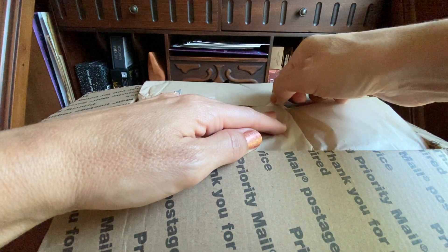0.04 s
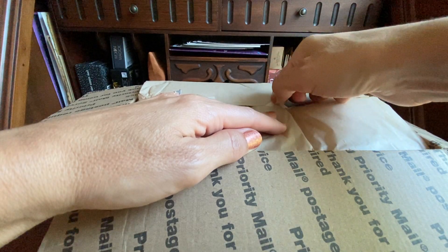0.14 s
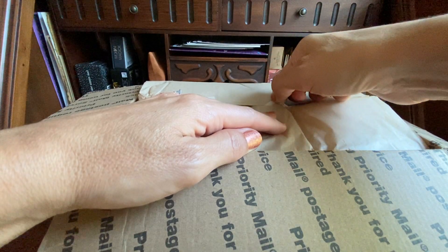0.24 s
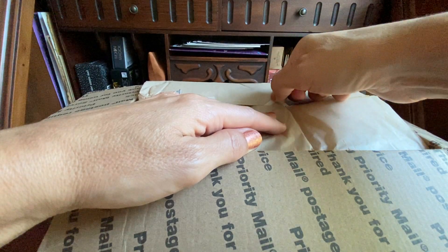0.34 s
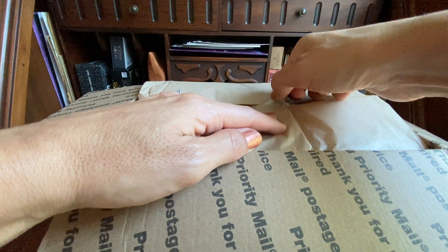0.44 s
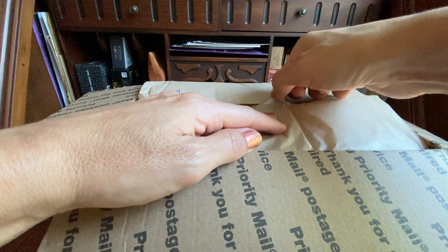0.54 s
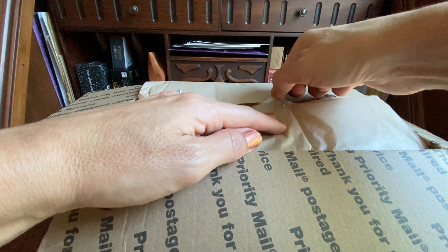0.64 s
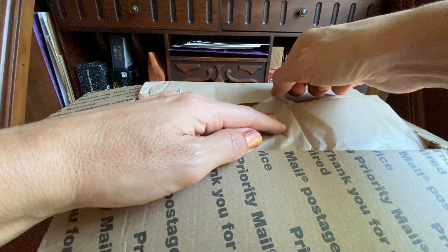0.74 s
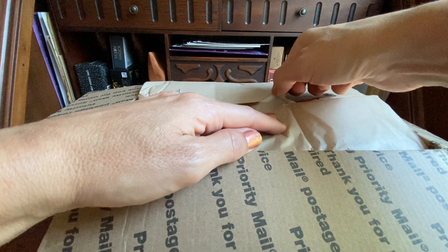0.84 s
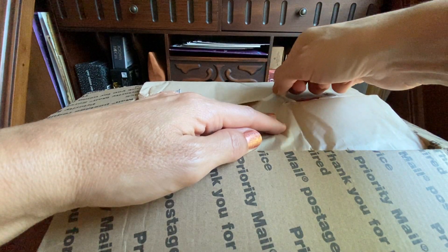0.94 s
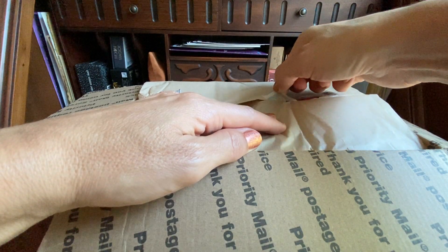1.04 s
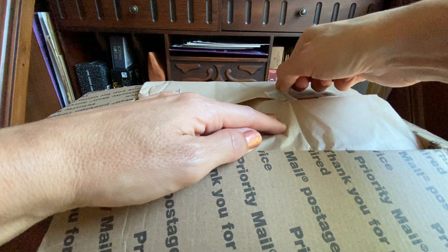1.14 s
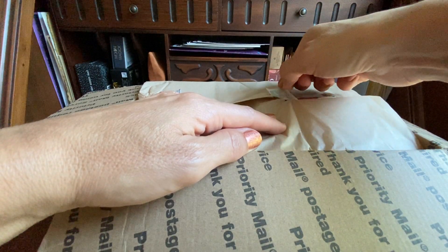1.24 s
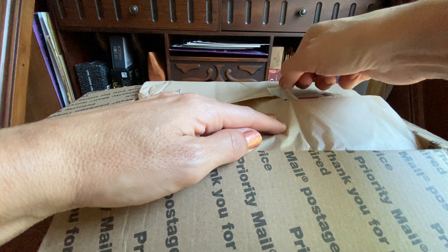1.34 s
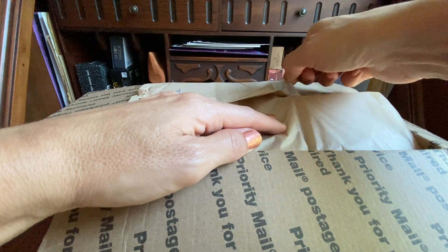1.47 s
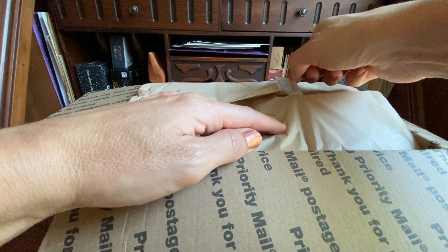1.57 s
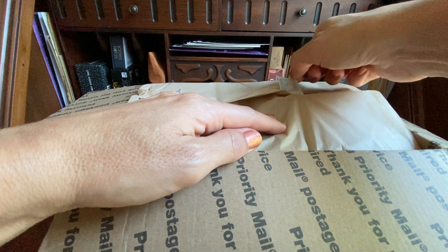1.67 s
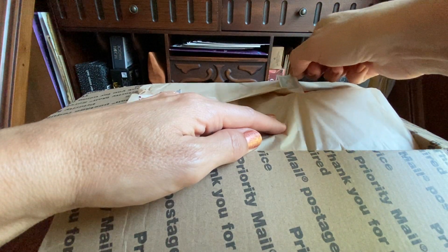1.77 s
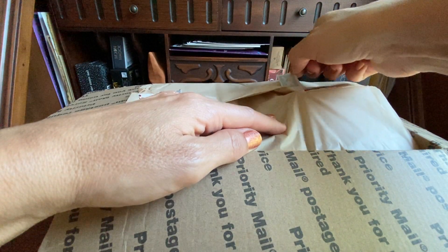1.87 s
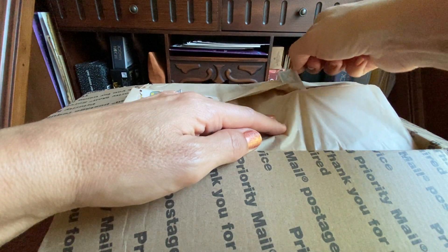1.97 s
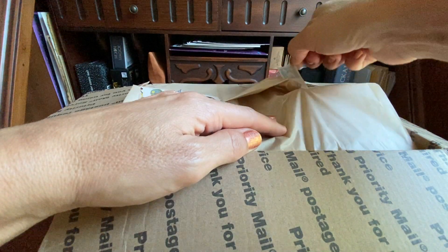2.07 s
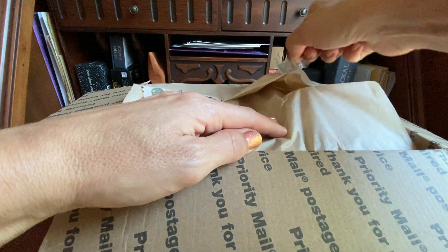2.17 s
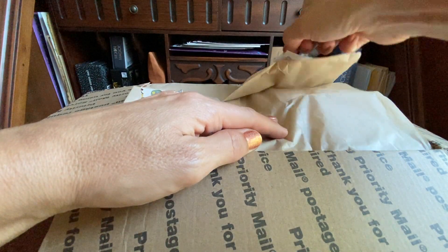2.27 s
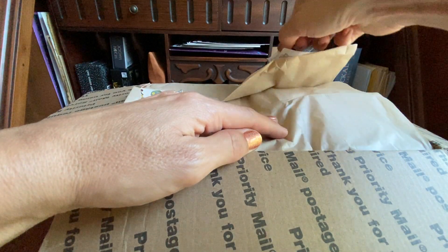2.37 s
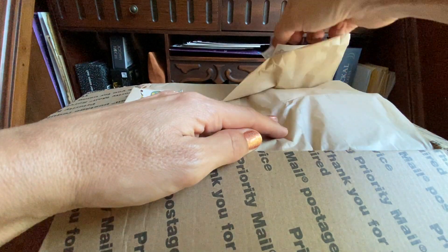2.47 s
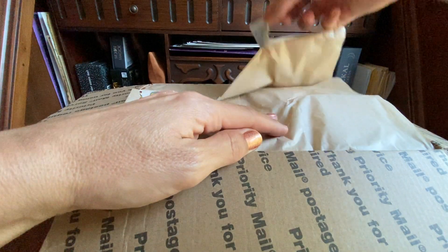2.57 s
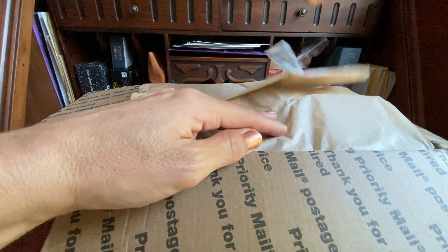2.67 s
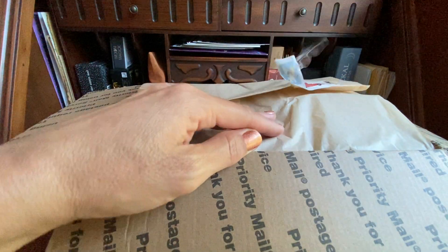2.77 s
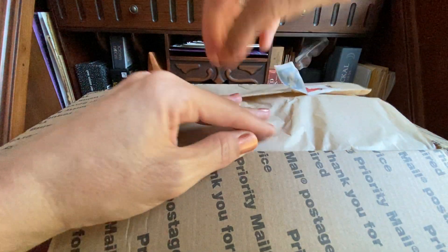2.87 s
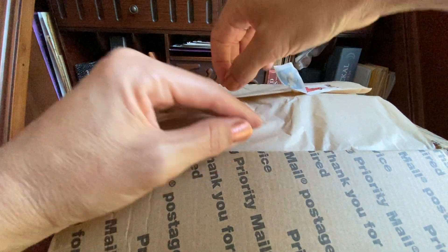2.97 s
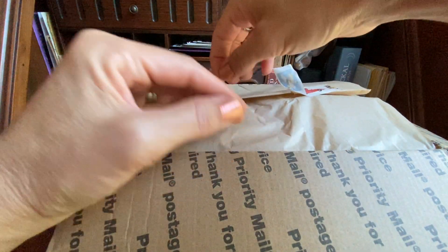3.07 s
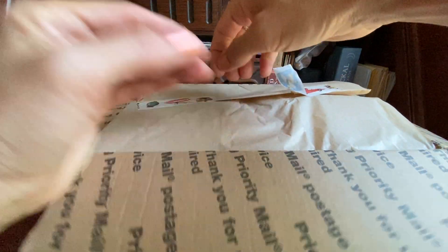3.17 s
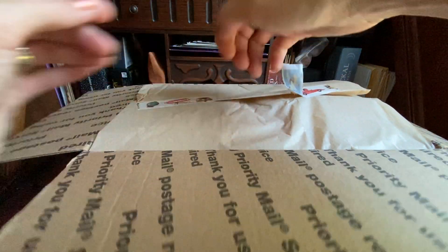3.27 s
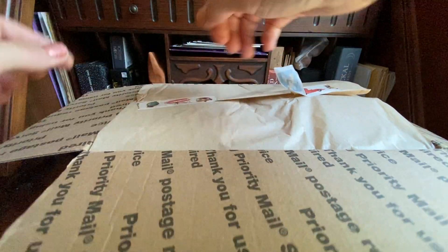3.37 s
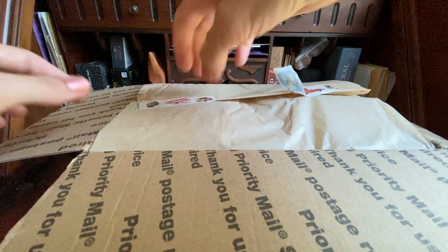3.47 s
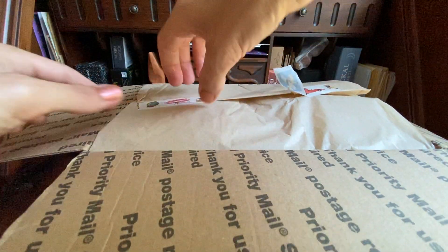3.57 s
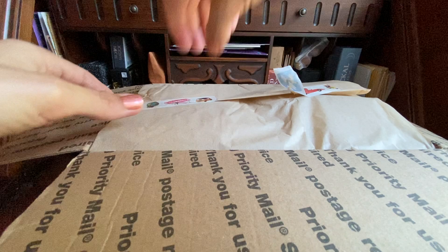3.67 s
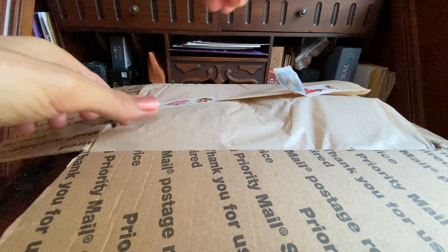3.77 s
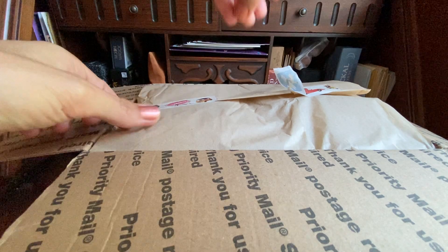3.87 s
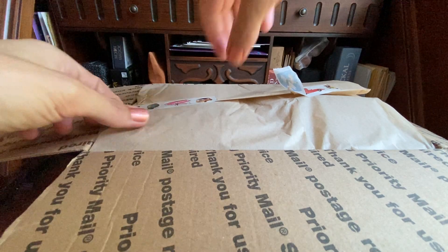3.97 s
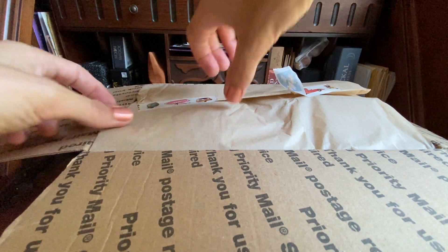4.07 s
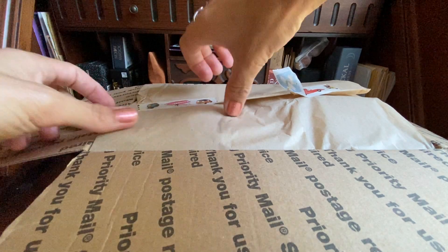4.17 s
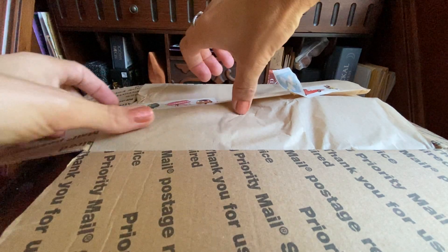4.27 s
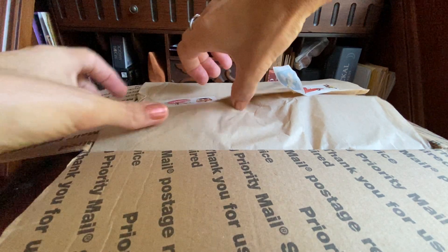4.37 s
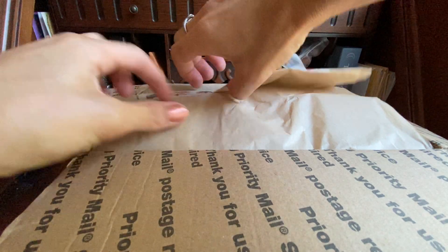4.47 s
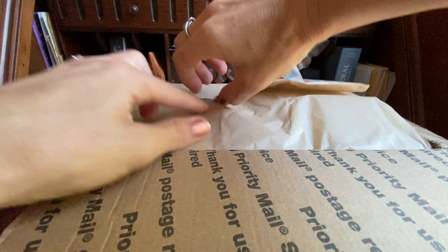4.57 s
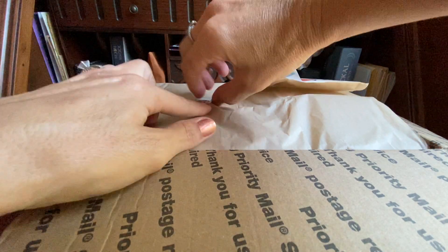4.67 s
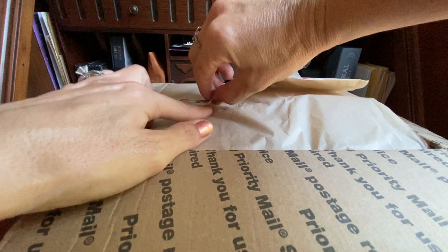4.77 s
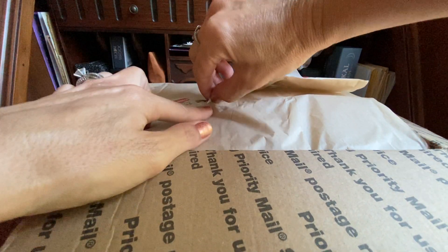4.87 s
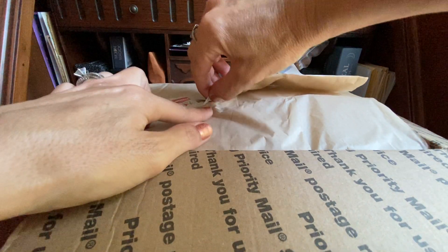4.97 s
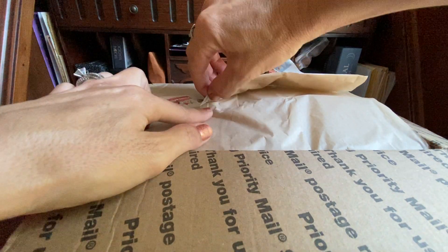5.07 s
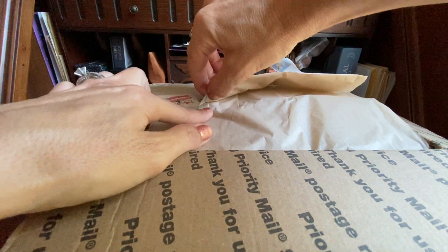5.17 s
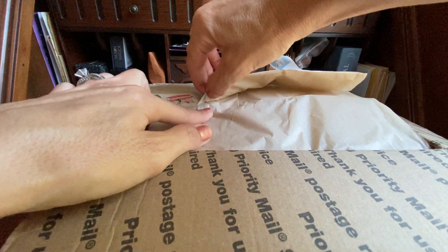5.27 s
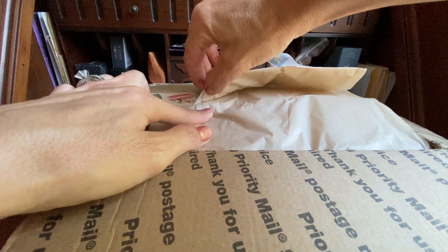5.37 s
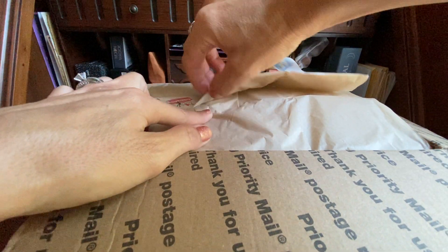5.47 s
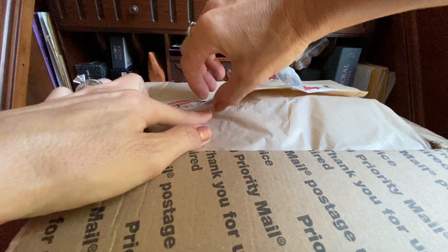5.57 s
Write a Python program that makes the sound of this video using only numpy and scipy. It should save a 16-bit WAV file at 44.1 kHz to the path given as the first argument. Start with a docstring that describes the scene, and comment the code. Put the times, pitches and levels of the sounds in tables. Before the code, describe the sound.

Close-up of fingers peeling paper tape from a padded paper bag, faint crackles building to a sharp ripping snap, then quieter crinkling.

```python
"""Fingers peel and tear paper tape off a padded paper bag in a cardboard box, close to a phone in a quiet room.
The peeling is swarms of tiny clicks as glue and fibres let go, filtered into bands that follow the pull.
Single creases snap as short noise bursts, knocks ring the box walls, and fingers brush and pat a hollow flap.
The two microphone ports share part of each sound and hear the rest by different bounces.
Soft room noise and a faint echo tail lie behind it all."""
import sys
import numpy as np
from scipy import signal
from scipy.fft import rfft, irfft, next_fast_len
from scipy.io import wavfile
from scipy.ndimage import uniform_filter1d

SR = 44100
rng = np.random.default_rng(int(sys.argv[2]) if len(sys.argv) > 2 else 0)


def generate_wav(sig):
    """Save sig (samples, or channels by samples) to the path in sys.argv[1] as 16-bit PCM at SR."""
    pcm = np.round(np.clip(np.atleast_2d(sig).T, -1, 1) * 32767).astype(np.int16)
    wavfile.write(sys.argv[1], SR, pcm)


N = 248268  # length in samples


def undb(db):
    """Turn decibels into a plain gain."""
    return 10 ** (np.asarray(db) / 20)


def unit(x):
    """Scale a sound to an average (RMS) level of 1."""
    return x / np.sqrt(np.mean(x ** 2))


def on_log(table, hz):
    """Read a (frequency, value) table on a log-frequency axis."""
    table_hz, value = np.transpose(table)
    return np.interp(np.log(np.maximum(hz, 1)), np.log(table_hz), value)


def read(table):
    """Turn the columns of a timed table into curves, sample by sample."""
    start_s, *columns = np.transpose(table)
    time_s = np.arange(N) / SR
    return [np.interp(time_s, start_s, column) for column in columns]


def shape(x, gain_at):
    """Filter along the last axis by a function of frequency."""
    length = x.shape[-1]
    size = next_fast_len(length + 4096)
    hz = np.arange(size // 2 + 1) * SR / size
    return irfft(rfft(x, size) * gain_at(hz), size)[..., :length]


def band(hz, lo_hz, hi_hz):
    """Gain of a steep filter that keeps what lies between two frequencies."""
    below = 1 + (lo_hz / (hz + 1)) ** 6
    above = 1 + (hz / hi_hz) ** 6
    return 1 / np.sqrt(below * above)


def resonances(table, hz):
    """Added gains of resonances, each a hump with its own pitch, width and level."""
    return sum(undb(level_db) / (1 + (2 * (hz - pitch_hz) / width_hz) ** 2)
               for pitch_hz, width_hz, level_db in table)


def paper(hz):
    """Gain of the bag: flat, plus resonances where the paper sounds more easily."""
    # bag and sheet resonances: pitch_hz, width_hz, level_db
    paper_modes = [(222, 180, 4.5), (810, 120, -2), (1186, 210, 2.5), (1860, 120, -2), (2220, 66, -4.5),
                   (5950, 1800, -3), (11600, 2700, -14.5)]
    return 1 + 0.67 * resonances(paper_modes, hz)


def swell(t_ms, rise_ms, fade_ms):
    """Loudness curve that grows for rise_ms and then dies away."""
    rise = (t_ms / max(rise_ms, .1)) ** 2
    fade = np.exp((rise_ms - t_ms) / max(fade_ms, .3))
    return np.minimum(rise, fade)


def walk(rate):
    """Random wandering: a new level is drawn rate times a second, with a smooth slide between levels."""
    hold = int(SR / rate)
    steps = np.repeat(rng.standard_normal(N // hold + 1), hold)
    return 0.95 * uniform_filter1d(steps, hold)[:N]


def room_noise():
    """The quiet room: steady random noise coloured by a frequency curve."""
    # colour of the room noise: pitch_hz, relative level_db (per Hz)
    room_colour = [(18, -32), (30, 3), (71, 11.5), (239, 4.5), (684, -41), (1010, -1), (1860, -20.5),
                   (3140, -22), (4080, -20), (10200, -52.5), (16000, -39.5)]
    noise = rng.standard_normal((3, N))
    coloured = shape(noise, lambda hz: undb(on_log(room_colour, hz)))
    return unit(coloured) * undb(-74.5)


def reverb(x, t60, db):
    """Faint diffuse tail from furniture and walls: fading noise that falls 60 dB in t60 seconds."""
    t = np.arange(SR // 2) / SR
    tail = rng.standard_normal((2, len(t))) * np.exp(-np.log(1000) * t / t60)
    tail = shape(tail, lambda hz: hz / (hz + 300) / (1 + hz / 4000))
    tail = tail * undb(db) / np.sqrt((tail[0] ** 2).sum())
    return signal.fftconvolve(x[None], tail, axes=1)[:, :N]


def pats():
    """Fingers brush and pat the box flap: skin-friction noise heard through a few hollow resonances."""
    # pats and brushes: start_s, level_db (noise is halved first), rise_ms, fade_ms, tilt_db (per octave)
    pat_events = [(3.093, -54.5, 6.7, 44, -3), (3.14, -42, 44, 13, -3), (3.182, -23.5, 4.8, 3.1, -6),
                  (3.618, -39, 2.8, 9.3, -5), (3.696, -35, 2.3, 12, 0), (3.709, -30, 5.4, 5.3, 1)]
    # resonances of the hollow flap: pitch_hz, width_hz, level_db
    flap_modes = [(850, 160, 0), (1780, 200, -3), (3000, 320, -4), (4530, 400, -13)]
    lowest_hz = flap_modes[0][0]
    t_ms = np.arange(8192) / SR * 1000
    noise = rng.standard_normal((len(pat_events), 3, len(t_ms)))
    out = np.zeros((3, N))

    def flap_gain(hz, tilt_db):
        octaves = np.log2(np.maximum(hz, lowest_hz) / lowest_hz)
        hollow = resonances(flap_modes, hz) + 0.04 * band(hz, 430.0, 10000.0)
        return hollow * undb(tilt_db * octaves)

    for (start_s, level_db, rise_ms, fade_ms, tilt_db), burst in zip(pat_events, noise):
        burst = shape(burst, lambda hz: flap_gain(hz, tilt_db))
        burst = unit(burst) / 2 * undb(level_db) * swell(t_ms, rise_ms, fade_ms)
        i = int(start_s * SR)
        out[:, i:i + len(t_ms)] += burst
    return out


def knocks():
    """A half-sine push sets the box walls ringing, with new strengths at every knock; low modes build up late."""
    # knocks: start_s, peak_db, push_ms, free (share of the full ring time left by the hand, 0-1),
    # boom_db (extra for the whole-box modes below 150 Hz)
    knock_events = [(0.081, -50.5, 0.57, 0.3, -12), (0.217, -67, 1, 0.3, 3), (1.444, -39, 1.2, 1, -10),
                    (1.47, -51.5, 0.64, 1, 3), (1.938, -53, 0.64, 0.5, -4), (2.098, -53, 0.8, 0.6, -6),
                    (2.214, -32.5, 0.8, 0.57, 3), (2.233, -38, 0.64, 0.18, -5),
                    (2.605, -43, 1.4, 0.8, -3.0), (2.629, -26.5, 0.91, 0.33, -7.5),
                    (2.722, -45.5, 0.7, 0.26, -0.5), (2.885, -33.5, 0.52, 0.16, -5.5),
                    (2.959, -40, 1.2, 0.08, 7), (2.99, -45.5, 1.6, 0.21, 3), (3.187, -26, 0.5, 0.86, -5),
                    (3.622, -44.5, 1.26, 0.96, -2.5), (3.634, -45, 1.8, 0.95, -6),
                    (4.182, -43, 1.3, 0.08, -3), (4.419, -43.5, 1.1, 0.5, 3), (4.596, -51.5, 1, 0.8, 15),
                    (4.687, -50, 0.85, 0.7, 2), (4.951, -47, 1.3, 1, -11), (5.324, -48, 0.75, 1, -6),
                    (5.487, -48.5, 0.92, 0.25, 0)]
    # box walls and air: pitch_hz, level_db, t60_s (time to fall 60 dB when ringing freely)
    box_modes = [(56, -5, 0.54), (92, -1, 0.25), (115.5, -6, 0.47), (197, -2.5, 0.15), (268.5, 9, 0.059),
                 (450, -3, 0.049), (533, -7.5, 0.076), (724, 0, 0.047), (846, -2, 0.023), (1060, -7, 0.025),
                 (1873, -5, .03)]
    t = np.arange(SR // 3) / SR
    hz, mode_db, t60_s = np.transpose(box_modes)[:, :, None]
    chance = rng.standard_normal((len(knock_events), 4, len(box_modes), 1))
    out = np.zeros((3, N + len(t)))
    for (start_s, peak_db, push_ms, free, boom_db), (detune, *strength) in zip(knock_events, chance):
        tones = np.sin(2 * np.pi * hz * (1 + .03 * detune) * t)
        rings = tones * np.exp(-np.log(1000) * t / (t60_s * free))
        build_up = np.minimum(t * hz / 1.2, 1)  # over 1.2 cycles
        rings = rings * build_up * undb(mode_db + boom_db * (hz < 150))
        push = np.sin(np.pi * np.linspace(0, 1, int(max(push_ms, .1) * SR / 1000) + 3))
        ring = (undb(2 * np.array(strength)) * rings).sum(1)
        ring = signal.fftconvolve(ring, push[None], axes=1)[:, :len(t)]
        i = int(start_s * SR)
        out[:, i:i + len(t)] += ring * undb(peak_db) / np.abs(ring).max(1).mean()
    return out[:, :N]


def snaps(events):
    """Each crease is a noise burst that swells, cracks and fades, with its own colour and a resonance."""
    # edges of the frequency bands, in Hz; snaps skip the lowest band
    band_edges = [40, 400, 2500, 7000, 16000][1:]
    rise_ms, shortest_fade_ms, drag_ms = 1.3, 1.44, 5.8
    strain_ms, tear_ms = 7.3, 9.8  # the sheet strains before a snap and tears on after it
    lead_ms = 20  # each burst starts this long before its snap, to hold the straining
    lead = int(lead_ms * SR / 1000)
    t_ms = np.arange(3072) / SR * 1000 - lead_ms
    noise = rng.standard_normal((len(events), 3, len(t_ms)))
    out = np.zeros((3, N + lead + len(t_ms)))
    # the crease gives way in one sharp crack at the height of the burst
    crack = 0.6 * np.exp(-((t_ms - rise_ms) / 0.25) ** 2)
    tear = np.exp(np.minimum((t_ms - rise_ms) / strain_ms, (rise_ms - t_ms) / tear_ms))

    def crease_gain(hz, ring_hz, shares_db):
        ring = 1 + 2 / (1 + (6 * (hz / ring_hz - 1)) ** 2)
        # dividing by the root of the width makes wide and narrow bands comparable
        colour = sum(undb(share_db) * band(hz, lo, hi) / np.sqrt(hi - lo)
                     for lo, hi, share_db in zip(band_edges, band_edges[1:], shares_db))
        return paper(hz) * ring * colour

    for (start_s, level_db, ring_hz, bright_db, crackle_db, tear_db), burst in zip(events, noise):
        # a clean snap is short; one inside a tear lasts longer
        fade_ms = shortest_fade_ms + drag_ms * undb(tear_db)
        envelope = swell(np.maximum(t_ms, 0), rise_ms, fade_ms) + crack + undb(tear_db) * tear
        shares_db = [-bright_db / 2, crackle_db, bright_db / 2]
        burst = shape(burst * envelope, lambda hz: crease_gain(hz, ring_hz, shares_db))
        # give each path the energy of its envelope
        even = np.sqrt((envelope ** 2).sum() / (burst ** 2).sum(1, keepdims=True))
        i = int(start_s * SR)
        out[:, i:i + len(t_ms)] += burst * undb(level_db - 8.5) * even
    return out[:, lead:lead + N]


def small_snaps(pull_db, crinkle):
    """List lesser creases that pop at random, as strong as the pull and the crackle allow."""
    snaps_per_s = 14
    above_pull_db, spread_db, tear_db = 12, 13, -15.5
    when, size, pitch, colour, crackle = rng.random((int(snaps_per_s * N / SR), 5)).T
    i = (when * N).astype(int)
    level_db = pull_db[i] + 20 * np.log10(crinkle[i] + .01) + above_pull_db - spread_db * size
    ring_hz = 750 * 8 ** (pitch ** 2)
    bright_db = 16 * (colour - .3)
    crackle_db = 14 * (crackle - .7)
    return list(zip(i / SR, level_db, ring_hz, bright_db, crackle_db, np.full(len(i), tear_db)))


def swarm(rate, spread_db):
    """Tiny releases at random moments, few large and many small, along each of the three paths."""
    hit = rng.random(N) < rate / SR
    size = undb(spread_db * np.minimum(rng.exponential(size=N), 6))
    return hit * size * rng.standard_normal((3, N))


def ticks(rate, spread_db, ms):
    """Loudness curve of small creases popping at random, each a brief swell."""
    size = undb(spread_db * np.minimum(rng.exponential(size=N), 2.8))
    hit = (rng.random(N) < rate / SR) * size
    t = np.arange(512) / SR * 1000 / ms
    return unit(signal.fftconvolve(hit, t * np.exp(-t))[:N])


def flexes(rate, lo_hz, hi_hz, cycles):
    """Patches of the sheet buckle at random, each ringing a few cycles at its own pitch."""
    when, pitch, size = rng.random((int(rate * N / SR), 3)).T
    hz = (lo_hz * (hi_hz / lo_hz) ** pitch)[:, None]
    t = np.arange(1024) / SR
    turns = rng.random((3, len(hz), 1))  # starting phases, different on each path
    tones = np.sin(2 * np.pi * (hz * t + turns))
    rings = tones * t * hz * np.exp(-t * hz / cycles) * undb(-14. * size[:, None])
    out = np.zeros((3, N + len(t)))
    places = (when * N).astype(int)[:, None] + np.arange(len(t))
    for path, ring in zip(out, rings):
        np.add.at(path, places, ring)
    return unit(out[:, :N])


def peel(pull_db, crinkle, box_db, body_db, glue_db, top_db):
    """Swarms of clicks shake box, sheet, fibres and glue; popping creases bunch them, in every band or in one."""
    # edges of the five bands, in Hz: box rumble, paper body, crackle, glue hiss, fine top hiss
    peel_edges = [40, 400, 2500, 7000, 11500, 16500]
    crackle_db = -6
    bursts_db = crinkle * (1.9 * walk(40) + 2.8 * walk(150))
    shared_pops = ticks(rate=130., spread_db=7.0, ms=0.29)
    out = 0
    for lo, hi, level_db in zip(peel_edges, peel_edges[1:], [box_db, body_db, crackle_db, glue_db, top_db]):
        own_pops = ticks(rate=120.0, spread_db=4.5, ms=0.75)
        bunch = np.sqrt(1 - crinkle ** 2) + crinkle * unit(shared_pops + 0.52 * own_pops)
        clicks = swarm(rate=16000., spread_db=1.5) * bunch * undb(bursts_db)
        layer = unit(shape(clicks, lambda hz: band(hz, lo, hi) * paper(hz)))
        out = out + layer * undb(pull_db + level_db)
    buckling = flexes(rate=260., lo_hz=600.0, hi_hz=6350.0, cycles=4.5)
    return out + crinkle * undb(pull_db + body_db - 7.0) * buckling


def ports(paths, lean):
    """Path 0 reaches both ports, turned in phase; paths 1 and 2 are bounces that reach one port each."""
    # how alike the ports are: pitch_hz, share common to both (0-1)
    likeness = [(60, 0.93), (300, 1), (800, 0.4), (3000, 0.15), (8000, 0.4), (10500, 1), (12100, .93),
                (16000, 0.3)]
    # difference in colour: pitch_hz, left_minus_right_db
    port_colour = [(60, 0.5), (110, 3.5), (200, 1), (380, -1), (700, 1.5), (1290, -3), (2380, -4),
                   (4400, 6), (8120, -4.5), (15000, 0.5)]
    # phase lead of the right port, lower and then upper frequencies: pitch_hz, lead (radians)
    port_turn = [(40, 1), (120, 0.77), (1000, 1.42), (3500, -1), (5000, 0), (6500, -3), (9500, -0.52)]
    port_turn_top = [(12100, np.pi), (16000, 3 * np.pi)]
    side = np.array([[1], [-1]])  # left, right

    def common(hz):
        return np.clip(on_log(likeness, hz), 0, 1)

    def turn(hz):
        return np.interp(hz, *np.transpose(port_turn + port_turn_top))

    both = shape(paths[:1], lambda hz: np.sqrt(common(hz)) * np.exp(-.5j * side * turn(hz)))
    bounces = shape(paths[1:], lambda hz: np.sqrt(1 - common(hz)))
    heard = both + bounces
    # the side on which the hand works shows only in the middle frequencies
    middle = shape(heard, lambda hz: band(hz, 500, 7000) ** 2)
    heard = heard + side * lean * middle
    return shape(heard, lambda hz: undb(side * on_log(port_colour, hz) / 2))


def scene():
    """Add the hand's sounds to the room noise, pass them to the two ports and add the echo tail."""
    # how hard the fingers pull or rub: start_s, level_db
    pull = [(0, -64), (.09, -62.5), (.13, -71), (.3, -65.5), (.8, -62.5), (.93, -53), (.99, -58),
            (1.11, -49), (1.24, -56.5), (1.3, -72.5), (1.35, -60.5), (1.446, -39.5), (1.63, -57.5),
            (1.72, -54), (1.88, -51.5), (1.95, -44), (2.13, -38.5), (2.17, -41), (2.21, -33.5),
            (2.29, -47.5), (2.43, -56), (2.53, -50), (2.605, -26.5), (2.64, -28), (2.69, -47.5),
            (2.76, -53), (2.85, -46.5), (2.89, -39), (2.935, -56), (2.985, -45.5), (3.02, -66),
            (3.165, -60), (3.19, -37.5), (3.215, -62), (3.36, -76), (3.61, -85.5), (3.625, -63.5),
            (3.685, -83.5), (3.698, -55), (3.72, -51), (3.84, -44.5), (3.92, -56), (3.96, -68.5),
            (4.02, -50), (4.05, -51.5), (4.11, -70), (4.15, -47), (4.3, -49), (4.46, -42), (4.5, -48.5),
            (4.7, -45), (4.8, -46.5), (4.83, -51), (4.9, -54), (5.0, -44.5), (5.07, -57), (5.25, -52.5),
            (5.33, -42), (5.39, -52.5), (5.45, -48), (5.63, -52)]
    # the contact: start_s, crinkle (0 smooth slide - 1 crackle), then levels against the pull:
    # box_db (rumble), body_db (paper), glue_db (hiss), top_db (fine hiss); last left_minus_right_db
    contact = [(0, 0.55, -10.5, -10.5, -10, -17, 2.5), (.6, .7, -8.5, -2, 0, -17, 2.5),
               (1.25, 0.54, -9, -6, -5, -23, 1), (1.45, 0.41, -7, -4, -3.5, -12, 1.5),
               (2.1, 0.66, -11, -6, -12, -7, 0), (2.6, 0.5, -9.5, -6.5, -7, -19, 1.5),
               (3.0, 0.84, -9, -5, -20.5, -10, 8), (3.19, 0.43, -7, -4.5, -6, -7, 5.5),
               (3.27, 0.54, 8, -3, -8, -8, 8), (3.45, 0.68, -2, -1, -7, -10, 8.5),
               (3.68, .5, 11, 5, -13.5, -9.5, 7), (3.74, 0.19, -15, -9.5, -15, -11, 11),
               (3.87, .15, -22, -9, -46, -11, 23), (3.91, 1, -9, -7, -23, -25, 12),
               (3.98, .3, -19, -8, -32, -7, 17), (4.2, .65, -10.5, -5.5, -33, -8.5, 6),
               (4.8, 0.42, -9.5, -8.5, -20, -9, 6), (5.05, 0.76, -11, -8, -28, -10, 7.5),
               (5.63, 0.52, -15, -7.5, -20, -9.5, 6.5)]
    # creases and tears: start_s, level_db (8.5 dB is taken off), ring_hz,
    # bright_db (hiss against paper body), crackle_db (between them), tear_db (tearing around it)
    snap_events = [(0.019, -45, 1900, -2, 0, -15), (0.054, -40.5, 1240, 6, -7, -12),
                   (0.08, -34.5, 2000, -0.5, -32, -14.5), (0.222, -40.5, 1980, 9, 1, -14.5),
                   (0.246, -48.5, 1170, -6, -12, -14), (0.301, -49, 1620, -6, -4, -12),
                   (0.371, -45.5, 1460, 3, -2, -4.5), (0.401, -47, 1930, 8, -8, -4.5),
                   (0.468, -38, 2030, 19, -15, -7.5), (0.488, -45, 1920, 15, -4, -14),
                   (0.578, -40.5, 1560, 0, -1, -13), (0.634, -34, 1880, 11.5, -3, -18),
                   (0.689, -40, 1370, 22, -9, -17), (0.707, -40.5, 1950, 14, -4, -17),
                   (0.735, -38, 1430, 22, -4, -21), (0.747, -36.5, 5200, 17, -7, -23),
                   (0.771, -45, 974, 9, -6, -19), (0.855, -35.5, 1160, 7, -1, -15),
                   (0.871, -47, 1120, 5, 0, -24), (0.932, -38, 1220, -4, 0, -8.5),
                   (1.034, -37.5, 1230, -8, 0, -14), (1.085, -36, 1360, 8, -4, -14),
                   (1.108, -27.5, 4640, 3.5, -28, -8), (1.16, -37.5, 767, 3, -12, -5),
                   (1.19, -36, 1370, 2, -12, -8), (1.226, -38, 4660, 15, -9, -17),
                   (1.373, -32.5, 5500, 10, -4, -23), (1.413, -30.5, 1280, -1, -4, -14),
                   (1.44, -24.5, 805, 3.5, -12, -7), (1.458, -27, 2030, -5, -4, -12),
                   (1.551, -38, 791, 5, -12, -18), (1.713, -38, 2000, 6, 0, -7.5),
                   (1.743, -36.5, 2190, 15, -2, -22), (1.783, -36.5, 1150, -3, -7, -9),
                   (1.816, -42.5, 3430, -6, 1, -4), (1.904, -36.5, 1240, -8, -4, -8),
                   (1.937, -31, 1920, 8, -4, -10.5), (1.994, -25, 1870, -6, -4, -17),
                   (2.049, -34, 1850, -15, -2, -13), (2.136, -24.5, 818, 0, -4, -13),
                   (2.168, -30, 1350, -3, -6, -14), (2.208, -15, 1770, 0.5, 2, -10),
                   (2.254, -23.5, 1320, 5, -5, -14), (2.268, -27.5, 1460, 10, -8, -16),
                   (2.341, -33, 5550, 10, -7, -9), (2.377, -40, 5560, 12, -7, -23),
                   (2.464, -35.5, 1080, 12, -10, -17), (2.487, -36.5, 840, 2, -6, -12),
                   (2.553, -31.5, 1370, 15, -10, -7), (2.576, -22.5, 6450, 5, -11, -12.5),
                   (2.589, -20, 1870, 11, -12, -17), (2.601, -9, 2260, 13, -4, -9),
                   (2.606, -14.5, 1150, 7.5, -3.5, -9.5), (2.625, -19, 1200, 2, -7, -4),
                   (2.72, -31, 738, -11, -12, -22), (2.835, -42, 1260, 5, -6, -15),
                   (2.86, -31, 1190, 13, -6, -11), (2.882, -24.5, 940, 4, -5, -12.5),
                   (2.957, -35, 3220, 5, -8, -10), (2.988, -35, 1110, 5.5, -4, -13.5),
                   (3.08, -46, 816, 4, -6, -10), (3.188, -23.5, 700, -9, -20, -11.5),
                   (3.272, -29.5, 3300, -1, 12, -33), (3.307, -48.5, 6880, 5, -15, -9),
                   (3.436, -61.5, 1480, 2, -1, -12.5), (3.478, -59.5, 1390, 3.5, -1, -16),
                   (3.504, -63, 1017, 0, -2, -12.5), (3.781, -39.5, 5000, -6, -4, -19),
                   (3.891, -41.5, 1650, 5, 2, -14), (3.9, -40.5, 740, 5, -4, -22),
                   (3.923, -42.5, 1620, 7, 1, -28), (3.951, -53, 3890, 3, 4, -20),
                   (4.101, -46, 1120, -14, -2, -23), (4.131, -38.5, 3220, 5, -4, -16),
                   (4.249, -32.5, 1620, 4, 5, -6.5), (4.303, -33.5, 750, 1, 4, -10),
                   (4.368, -35, 4850, 13, 1, -20), (4.388, -33, 990, 8, -1, -8),
                   (4.409, -32, 4880, 13, -19, -4.5), (4.435, -31, 1120, 10, -3, -5),
                   (4.47, -27, 3700, 9, -16, -10), (4.551, -33, 985, 6, -4, -14),
                   (4.597, -32, 5350, 7, -13, -6), (4.638, -30.5, 1120, 5, 1, -14),
                   (4.697, -31.5, 1120, 2, -4, -6), (4.744, -35, 1160, 7, -4, -15),
                   (4.784, -28.5, 5660, 2.5, -11, -10), (4.856, -27.5, 5000, 1, 15, -17.5),
                   (4.89, -38, 5240, 5, -8, -12), (4.932, -29.5, 3850, 11, -7, -27),
                   (4.954, -32.5, 800, -5, -13, -15.5), (4.984, -26.5, 6900, 14, 6, -18),
                   (5.04, -28.5, 6650, 13, -7, -18), (5.051, -25, 4740, 13, -4, -32),
                   (5.171, -28.5, 980, 4, -6, -26), (5.294, -24.5, 4560, 9.5, -18, -15.5),
                   (5.342, -31.5, 5070, 17, -3, -7.5), (5.404, -44, 1330, -3, -6, -20),
                   (5.423, -34, 5350, 14, 4, -21), (5.474, -34.5, 1260, -1, 5, -8),
                   (5.561, -37, 1010, -8, -7, -14), (5.599, -34.5, 1390, 13, -13, -19)]
    pull_db, = read(pull)
    crinkle, *colour, pan_db = read(contact)
    crinkle = np.clip(crinkle, 0, 1)
    creases = snaps(snap_events) + snaps(small_snaps(pull_db, crinkle))
    near = peel(pull_db, crinkle, *colour) + creases + knocks() + pats()
    lean = np.tanh(pan_db * np.log(10) / 40)  # left-right difference in dB as a share
    return ports(near + room_noise(), lean) + reverb(near[0], t60=0.15, db=-12.0)


def record(dry):
    """The phone cuts the deep bass below 52 Hz and the top above 15.9 kHz."""
    dry = signal.sosfilt(signal.butter(3, 52, "high", fs=SR, output="sos"), dry)
    return signal.sosfilt(signal.ellip(8, .2, 70, 15900, fs=SR, output="sos"), dry)


dry = scene()
out = record(dry)
generate_wav(out)
```